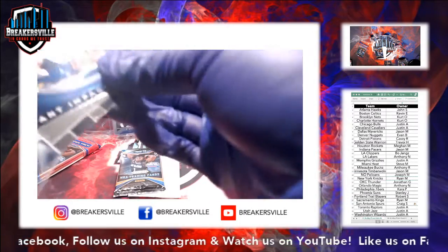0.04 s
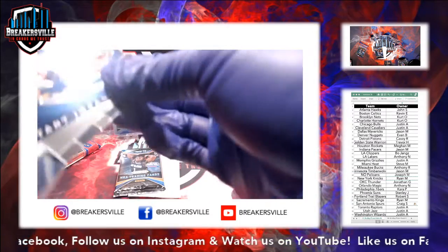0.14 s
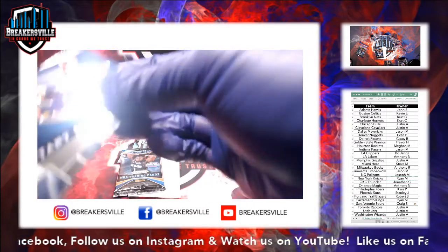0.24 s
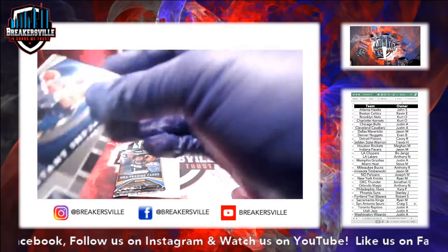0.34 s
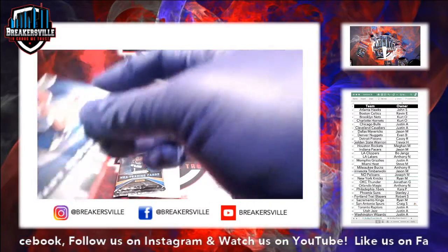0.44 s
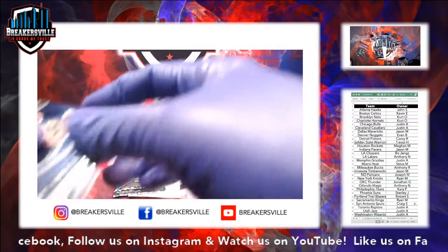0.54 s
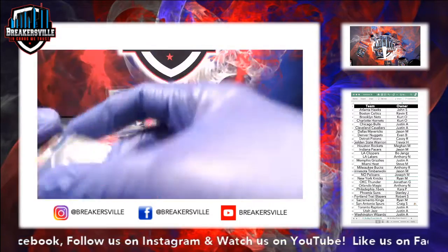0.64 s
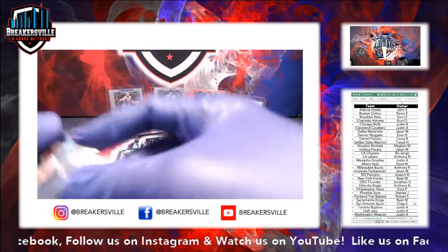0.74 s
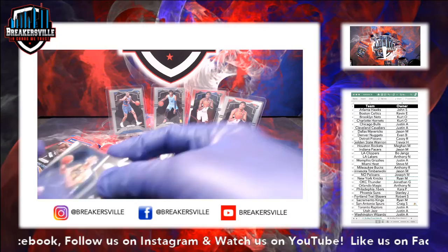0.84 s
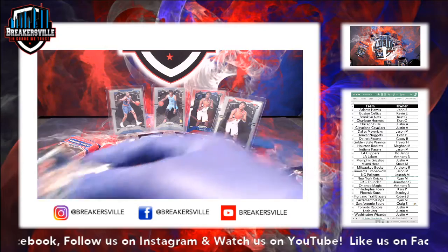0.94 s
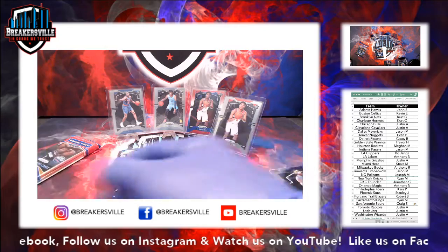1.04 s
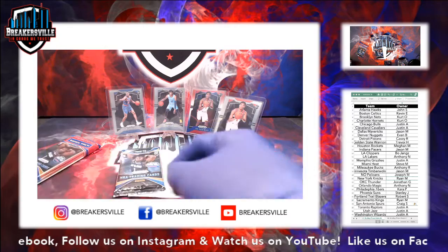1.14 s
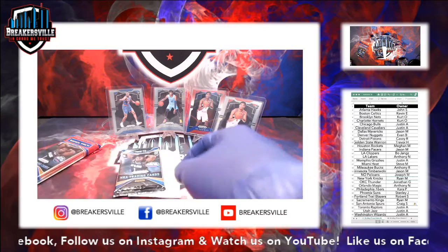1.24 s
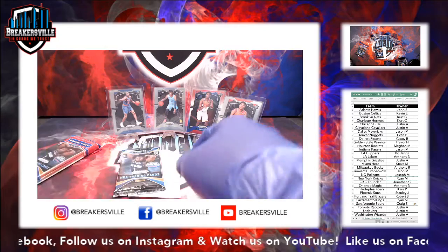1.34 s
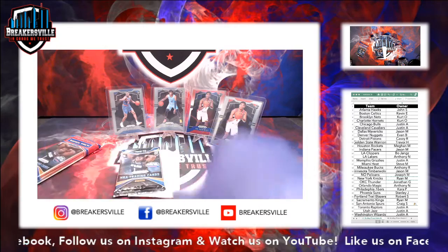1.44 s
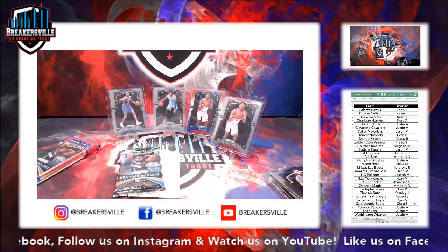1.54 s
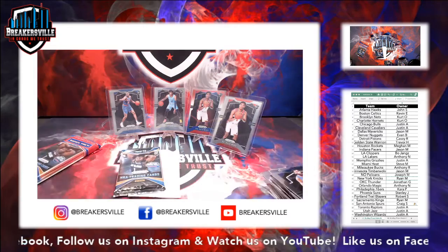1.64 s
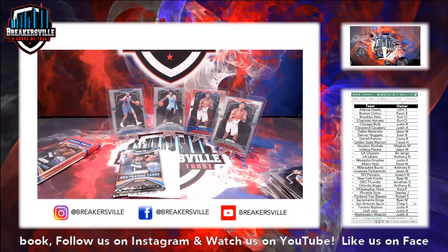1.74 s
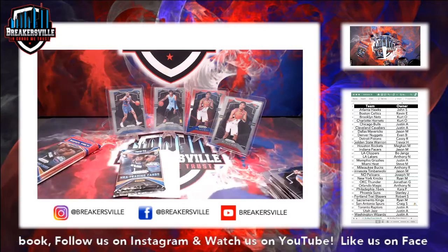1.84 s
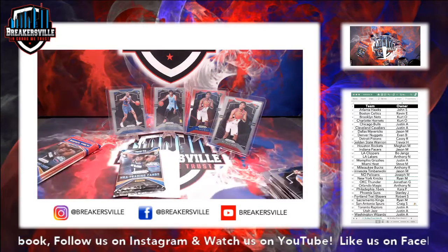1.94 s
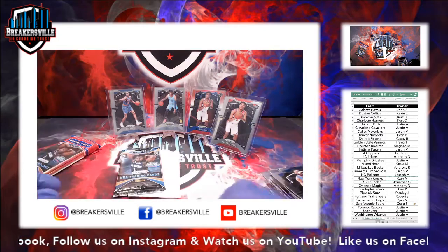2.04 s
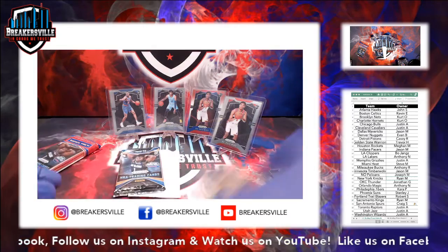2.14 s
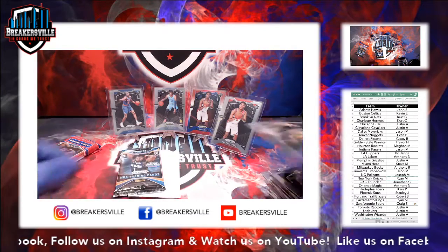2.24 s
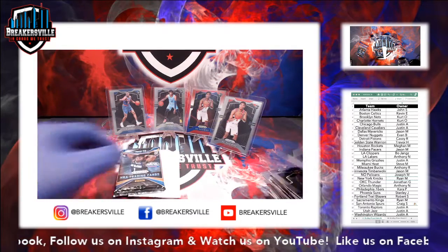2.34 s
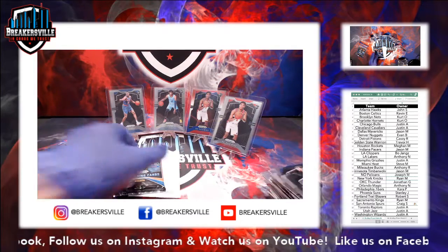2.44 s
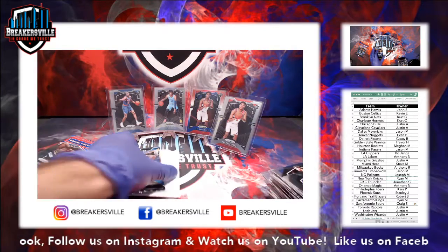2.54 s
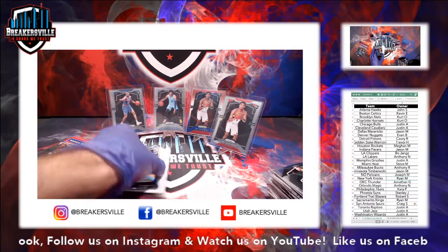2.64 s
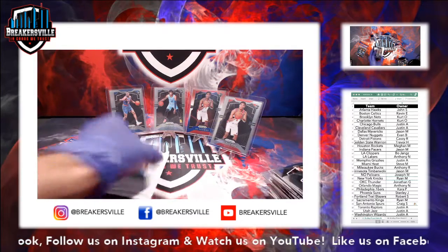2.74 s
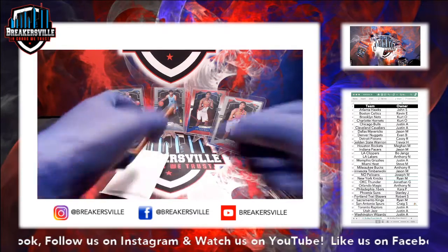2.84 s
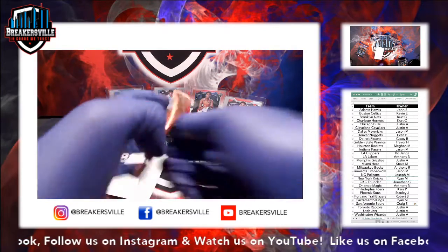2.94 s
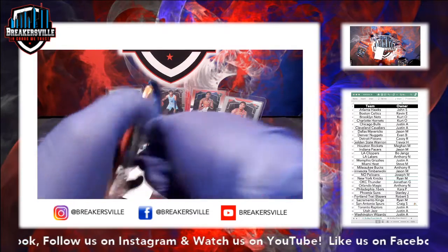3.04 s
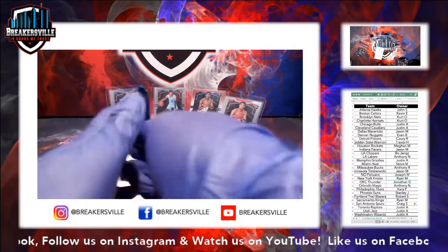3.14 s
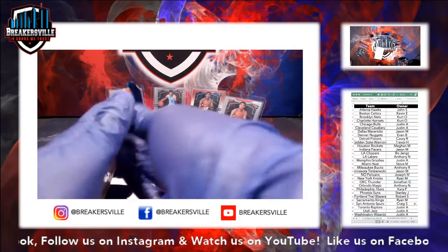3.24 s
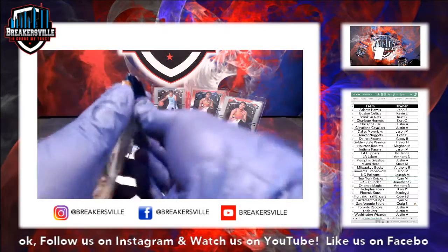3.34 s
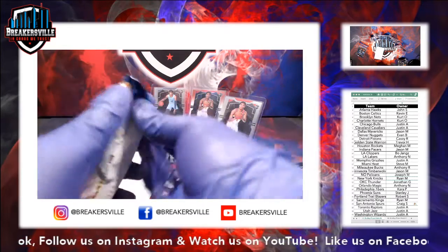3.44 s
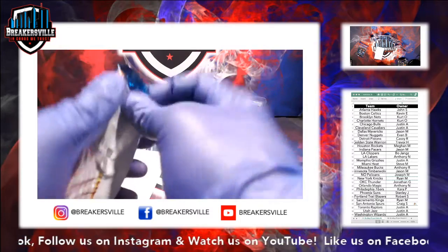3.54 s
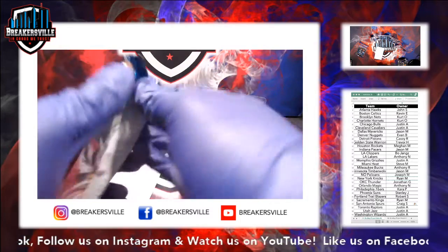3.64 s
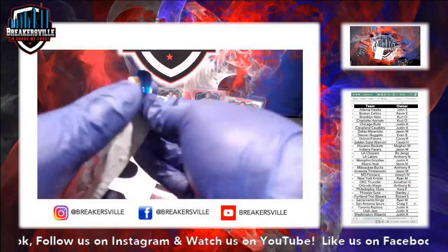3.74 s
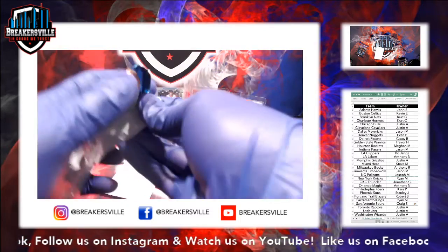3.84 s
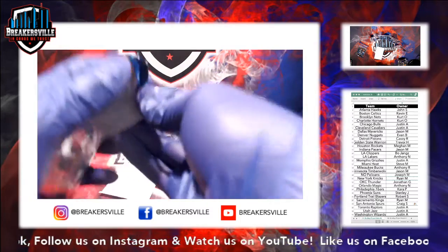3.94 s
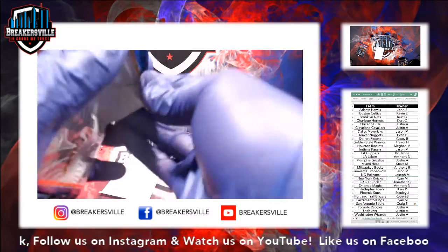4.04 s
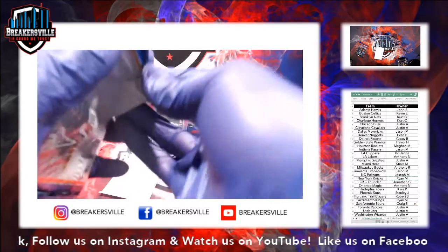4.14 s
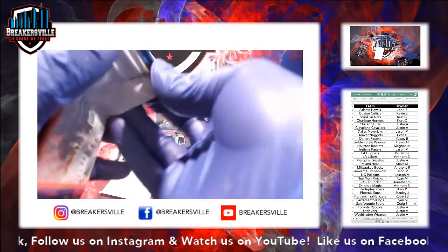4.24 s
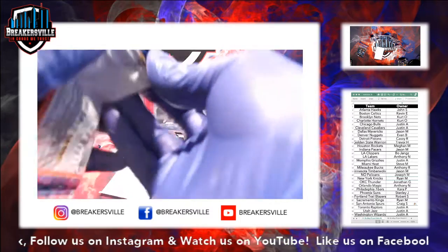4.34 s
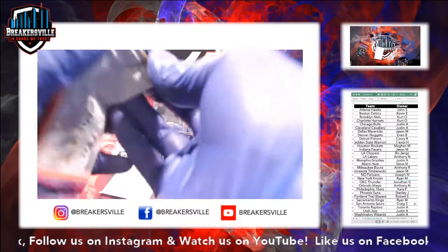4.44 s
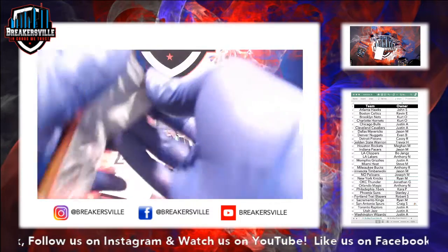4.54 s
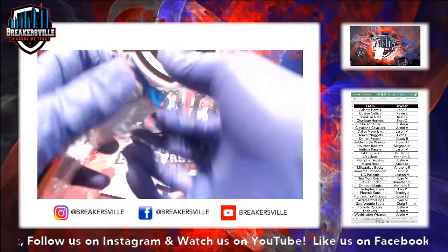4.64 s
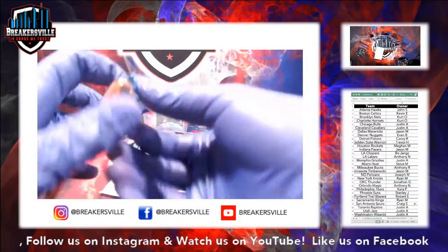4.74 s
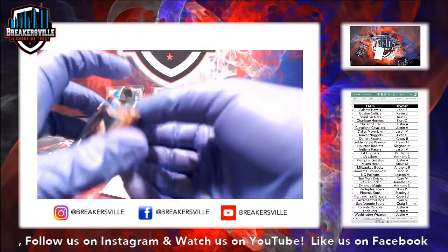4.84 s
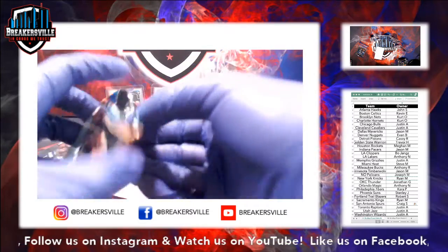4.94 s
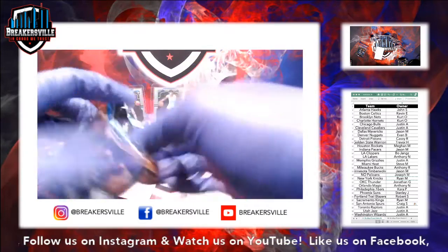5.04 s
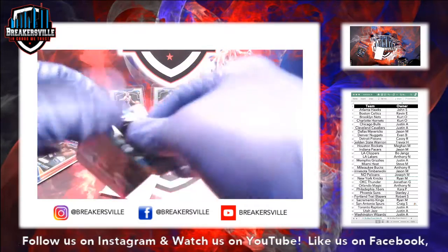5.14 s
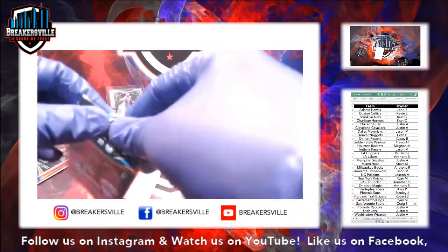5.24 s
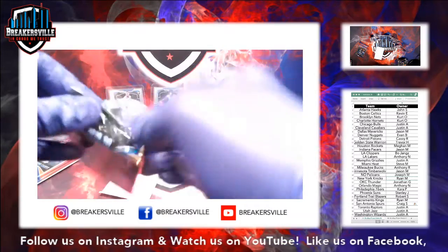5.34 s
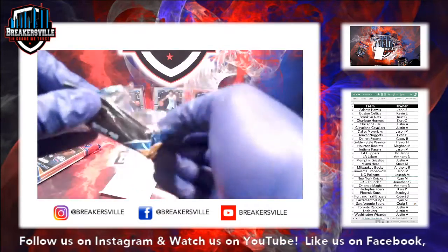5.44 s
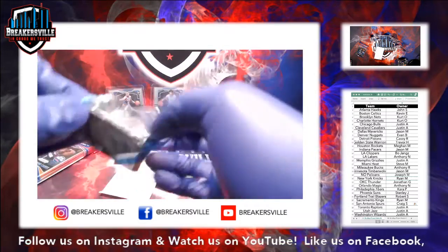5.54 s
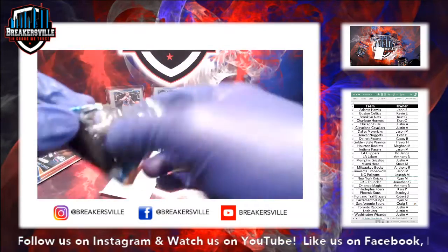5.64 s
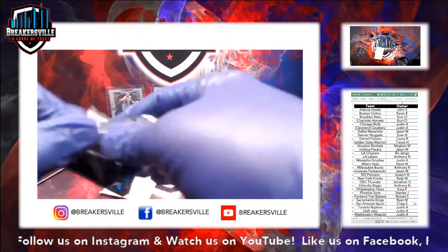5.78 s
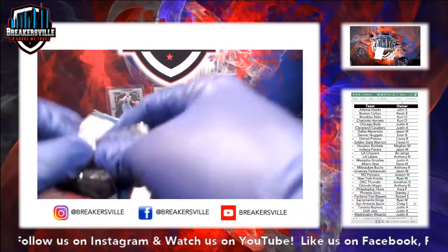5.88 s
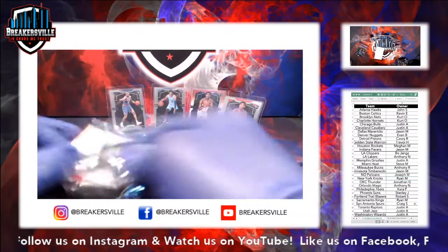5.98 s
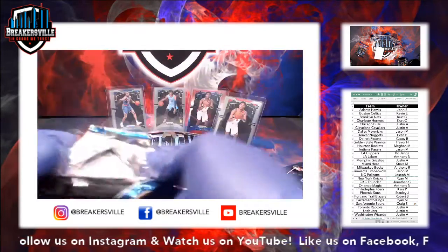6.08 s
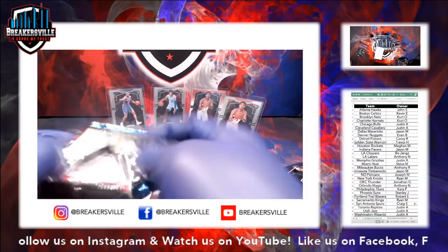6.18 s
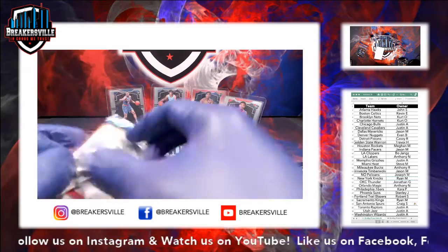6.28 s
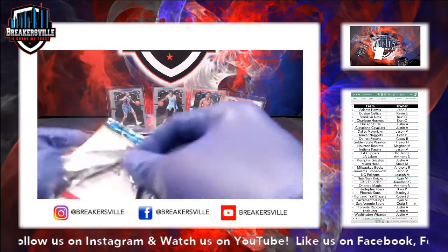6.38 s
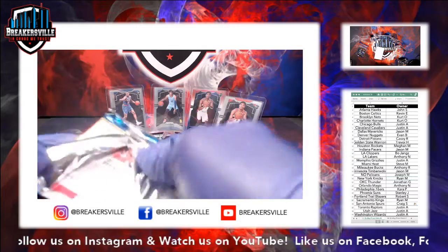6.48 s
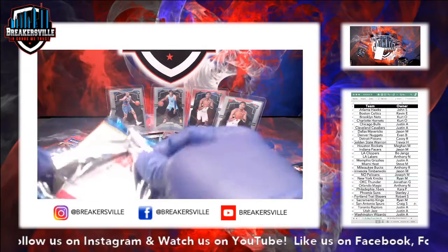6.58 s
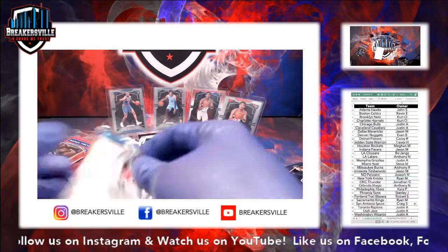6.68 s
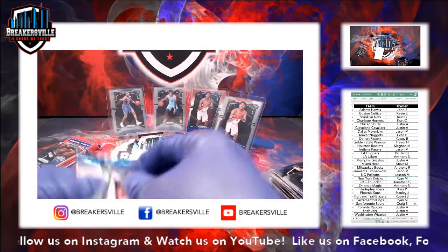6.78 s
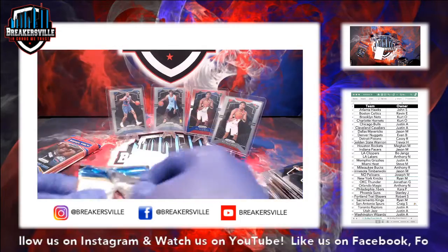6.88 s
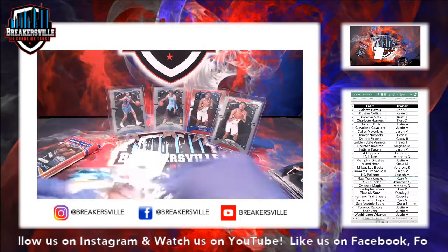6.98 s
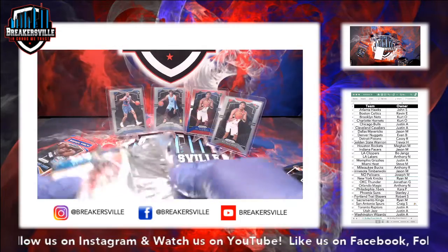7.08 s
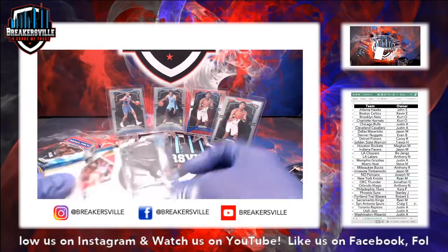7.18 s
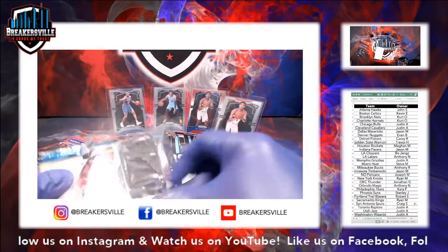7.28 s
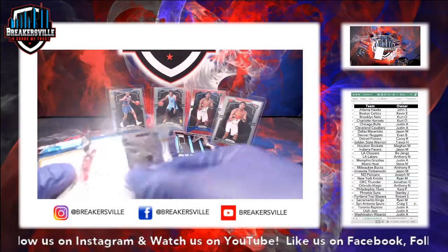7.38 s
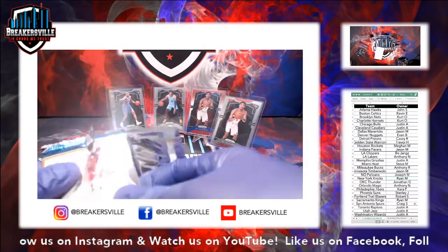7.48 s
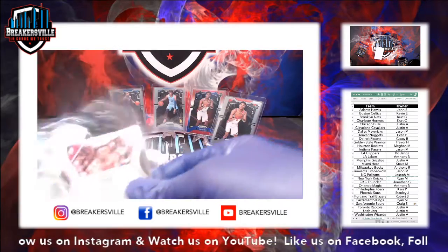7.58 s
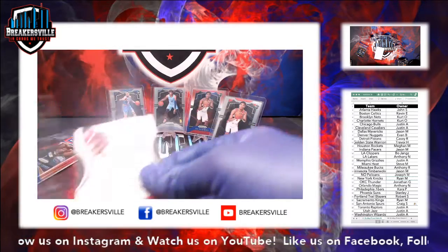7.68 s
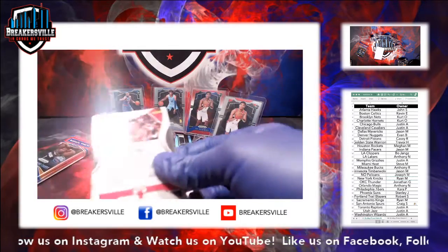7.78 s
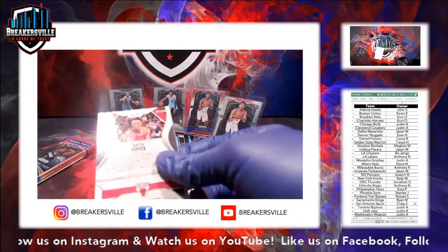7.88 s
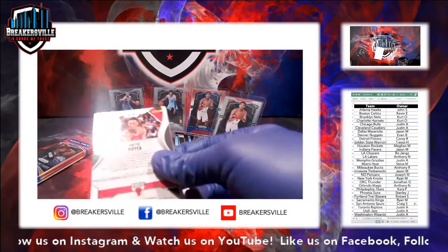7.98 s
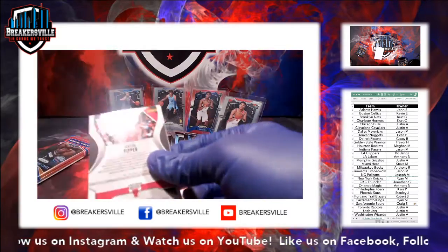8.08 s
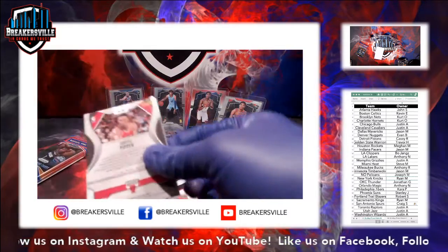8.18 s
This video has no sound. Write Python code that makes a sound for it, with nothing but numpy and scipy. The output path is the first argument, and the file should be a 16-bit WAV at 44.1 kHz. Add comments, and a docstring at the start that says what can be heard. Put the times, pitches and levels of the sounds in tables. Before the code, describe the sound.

Soft low table thumps and faint rustles, then a foil wrapper is crinkled and torn by hand in sharp crackling bursts, close up.

```python
"""Gloves slide lightly over a foil card wrapper in a small quiet room, close to a stereo microphone.
A few knocks on the table top follow, travelling into the microphone stand as damped table modes.
Then the wrapper is torn and crinkled: creases snap singly and in showers as noise bursts that ring
film facets and air pockets, over the filtered hiss of rubbing gloves. Puffs of air push the
microphone; ventilation rumble and microphone hiss lie underneath as shaped noise."""
import sys
import numpy as np
from scipy import signal
from scipy.fft import rfft, irfft
from scipy.io import wavfile
from scipy.ndimage import uniform_filter1d

SR = 44100
rng = np.random.default_rng(int(sys.argv[2]) if len(sys.argv) > 2 else 0)


def wav_out(sig):
    """Save sig, one row per channel (or a flat mono array), as 16-bit PCM at SR to the path in sys.argv[1]."""
    wavfile.write(sys.argv[1], SR, np.round(np.clip(np.atleast_2d(sig).T, -1, 1) * 32767).astype(np.int16))


N = 362237

# The room at rest. Each row: frequency in Hz, relative level in dB per Hz.
HUSH_SPECTRUM = [(15, -43), (30, -0.5), (60, 5.5), (110, -9.5), (229, -7.5), (293, -18), (796, -14.5),
                 (1150, -19), (1500, -14.5), (2480, -21), (8360, -31.5), (14400, -42), (16000, -53.5)]
# Likeness of the two channels in the room at rest. Each row: frequency in Hz, likeness 0-1.
HUSH_LIKENESS = [(50, 0.25), (500, 0.58), (4000, 0.29)]
# Gloves sliding lightly between the squeezes. Each row: time in seconds, relative level in dB.
SLIDING = [(0, -62), (.06, -101), (.12, -64), (.17, -77), (.27, -63), (.43, -72), (.5, -63.5), (.62, -64),
           (.9, -80), (1.6, -80), (1.75, -69), (1.95, -72), (2.1, -81.5), (3.2, -78), (4.4, -89),
           (5.9, -82), (6.1, -56.5), (6.5, -102), (6.75, -80.5), (7.05, -58.5), (7.7, -64), (8.21, -105.5)]
# Squeezes and pulls on the film. Each row: time of most force in seconds, relative rustle level in dB,
# build-up over 20 dB in seconds, die-away over 20 dB in seconds, share of smooth rubbing 0-1.
SQUEEZES = [(0.659, -48, 0.033, 0.014, 0.55), (.728, -58, 0.025, 0.032, 0.3), (.78, -59, 0.055, 0.12, 0.5),
            (.98, -55, 0.022, 0.046, 0.58), (1.24, -67.5, 0.13, 0.25, 0.4),
            (2.001, -61, 0.038, 0.037, 0.95), (2.4, -63, 0.086, 0.15, 0.02),
            (2.559, -54, 0.036, 0.26, 0.37), (2.96, -42.5, 0.02, 0.035, 0.07), (3.09, -52, 0.19, 0.04, 0.3),
            (3.16, -48, 0.035, 0.41, 0.07), (3.33, -41, 0.093, 0.051, 0.06), (3.39, -40, 0.058, 0.078, 1),
            (3.454, -32.5, 0.027, 0.087, 0.44), (3.511, -37, 0.16, 0.033, 0.56),
            (3.606, -36, 0.056, 0.1, 0.1), (3.788, -37.5, 0.046, 0.16, 0.01),
            (3.865, -45.5, 0.052, 0.041, 0.05), (3.947, -35, 0.024, 0.04, 0.2),
            (4.04, -48.5, 0.11, 0.21, 0), (4.198, -31, 0.024, 0.052, 0.44), (4.262, -48, .05, 0.14, 0.27),
            (4.54, -42.5, 0.021, 0.12, 0.24), (4.58, -42, 0.061, 0.12, 0), (4.709, -35.5, 0.022, 0.025, 0),
            (4.819, -41, 0.15, 0.049, 0.44), (4.92, -49.5, 0.034, 0.15, 0.01),
            (5.039, -42.5, 0.21, 0.17, 0), (5.18, -52, 0.16, 0.26, 0.14), (5.319, -37.5, 0.016, 0.35, 0.1),
            (5.37, -40, 0.057, 0.17, 0.44), (5.46, -45, 0.12, 0.16, 0.03), (5.67, -40.5, 0.074, 0.14, 0.28),
            (5.801, -39, 0.068, 0.039, 0.1), (5.873, -40, 0.062, 0.059, 0.1),
            (5.981, -29.5, 0.025, 0.13, 0.54), (6.02, -18, 0.043, 0.038, 1),
            (6.222, -36.5, 0.14, 0.051, 0.18), (6.331, -31.5, 0.062, 0.022, 0.08),
            (6.385, -34, 0.034, 0.17, 0.1), (6.42, -29, 0.068, 0.039, 0.3),
            (6.659, -38.5, 0.11, 0.096, 0.13), (6.79, -40, 0.0099, 0.02, 0.14),
            (6.872, -38.5, 0.0095, 0.14, 0.1), (6.924, -28.5, 0.058, 0.13, 0.43),
            (6.982, -25.5, 0.097, 0.042, 0.68), (7.16, -43.5, 0.16, 0.05, 0.13),
            (7.269, -53, 0.079, 0.33, 0.2), (7.5, -54, 0.27, 0.17, 0.7), (7.589, -41, 0.16, 0.065, 0.46),
            (7.999, -64, 0.076, 0.071, 0.06)]
# Rubbing of a firm glove. Each row: frequency in Hz, relative level in dB per Hz.
FIRM_GLOVE = [(200, -53), (1000, -12), (3000, 3.5), (7000, 4.5), (15000, -7.5)]
# Rubbing at the lightest touch, which is thinner. Each row: frequency in Hz, relative level in dB per Hz.
LIGHT_GLOVE = [(2500, -19.5), (7500, 0), (11000, -11), (15000, -6.5)]
# Colour of the creasing film. Each row: frequency in Hz, relative level in dB per Hz.
FILM_SPECTRUM = [(200, -22.5), (800, -25.5), (1500, -5), (2300, -3.5), (3500, -2.5), (7000, -1.5),
                 (10500, -5.5), (15000, -11.5)]
# Air pockets of the wrapper. Each row: resonance in Hz, relative level in dB.
AIR_POCKETS = [(400, -4.5), (600, -2), (820, -14), (1150, -2.5), (1350, -1.5), (1600, -4.5)]
# Place of the hands and opening of the pouch. Each row: time in seconds, left over right in dB,
# hollowness of the pouch in dB.
SIDE_OF_HANDS = [(0, 4.5, -10.5), (2.4, 4, -2.5), (3.2, 7, -13), (5.2, 4.5, -9), (6, 5.5, -10.5),
                 (6.4, 5, -11), (7, 4.5, -4), (7.3, 5, -4)]
# Likeness of the two channels in the film sound. Each row: frequency in Hz, likeness 0-1.
FILM_LIKENESS = [(60, 0.19), (380, 0.97), (2380, 0.51), (15000, 0.26)]
# Single loud creases. Each row: start in seconds, relative level in dB, pitch of the buckling facet in Hz,
# pop of the air pocket in dB relative to the crease, pitch of the pocket in Hz.
SNAPS = [(0.116, -47.5, 3160, -13, 1200), (0.6528, -43.5, 7600, -8.5, 303), (0.7541, -40.5, 3300, 5, 1250),
         (0.7881, -51, 4970, -18, 2400), (0.8174, -50, 6040, -6, 3000), (0.846, -50, 2980, -21, 840.0),
         (0.8865, -49, 4500, -30, 1500), (1.283, -46, 7600, -10, 700), (2.3973, -44.5, 1960, -8, 374),
         (2.474, -46.5, 5860, -30, 1400), (2.92, -41, 5990.0, -0.5, 327), (2.9544, -30, 5000, -30, 1300),
         (2.974, -33, 4080, -2.5, 2140), (2.9944, -28.5, 7960, -17, 1920), (3.054, -43.5, 7700, -7, 1160),
         (3.1489, -31, 5240, -19, 460), (3.184, -33, 8600, -16, 1640), (3.2198, -32.5, 5400, -17, 1890.0),
         (3.269, -41.5, 7920.0, 7, 1200), (3.2821, -30, 4470, -14, 1610), (3.3059, -16, 8600, -13.5, 1660),
         (3.3341, -16.5, 4060, -13.5, 1280), (3.3417, -17.5, 8850, -19, 450),
         (3.3654, -15.5, 9300, -34, 1240), (3.395, -28, 4000, -14, 460), (3.442, -19, 7050, -23, 595),
         (3.4924, -21.5, 6600, -20, 1200), (3.502, -21.5, 6360, -9.5, 1310),
         (3.514, -24.5, 3600, -13.5, 676), (3.5335, -26, 3600.0, -18, 690.0),
         (3.602, -32, 9090.0, -2, 1820), (3.664, -31.5, 4670, -11.5, 466), (3.674, -33.5, 3940, 0, 1270),
         (3.722, -30, 4150, -15, 1240), (3.7715, -32.5, 3730.0, -7, 935), (3.785, -24.5, 3600, -16, 517),
         (3.8087, -24.5, 6900, -3, 1770), (3.856, -30.5, 5200, -14, 1210), (3.9191, -28, 3400, -16, 1280),
         (3.94, -20, 3600, -5, 1580), (3.952, -25, 4470, -6.5, 1650), (3.9916, -29.5, 3460, -14, 1890.0),
         (4.026, -18.5, 3480, -9.5, 1370), (4.053, -31, 2700, -10, 1660.0), (4.078, -28, 3500, -15, 1650),
         (4.1257, -33, 3480, -16, 1700.0), (4.172, -29, 4260, -9, 1610.0), (4.1821, -12, 6060, -20, 1350),
         (4.193, -12.5, 9100, -21, 1370), (4.208, -18, 3600.0, -0.5, 1590), (4.2175, -14, 3360, -7.5, 1740),
         (4.261, -25.5, 3600, -38, 1590.0), (4.2956, -29, 3630, -10.5, 1980),
         (4.472, -55.5, 2010, 17.5, 1360), (4.534, -20.5, 3600, -13.5, 1380),
         (4.553, -24.5, 3780, -3.5, 1360), (4.568, -19.5, 3600, -6, 1280), (4.587, -21, 3450, -24, 1440),
         (4.6127, -16.5, 3500, -12, 1570), (4.6982, -17, 3600, -14, 2130), (4.715, -18, 5900, -31, 1700),
         (4.7614, -22.5, 7960, -40, 1570.0), (4.7778, -23, 7900, -19, 1900),
         (4.7866, -24, 9260.0, -14, 1300), (4.809, -23, 7000, -22, 420), (4.8403, -27.5, 9100, -37, 1640.0),
         (4.9146, -29, 6100, -7.5, 1520), (4.9585, -28, 5300.0, -17, 530), (4.9966, -32, 5900, -30, 1160.0),
         (5.0256, -31, 4240, -3.5, 1300), (5.0416, -25.5, 4250, -8.5, 360),
         (5.071, -26.5, 6200, -8.5, 1450), (5.1244, -32, 4860, -9, 1760), (5.174, -27, 2900, -42, 1910),
         (5.29, -26.5, 10000, -22, 320.0), (5.3568, -32, 4280, 0, 1380), (5.4403, -21.5, 3530, -10, 1190),
         (5.4624, -26, 5080.0, -9, 1030.0), (5.487, -48.5, 5000, -4, 1000),
         (5.5148, -31, 3720, -31, 1810.0), (5.5277, -34, 1300, 1.5, 710), (5.6693, -26, 6200, -14, 650),
         (5.704, -22.5, 3660, -19, 1280), (5.728, -18.5, 6250, -26, 1130),
         (5.862, -25.5, 3350, -30, 1120.0), (5.8793, -33.5, 2760, -1, 507), (6.016, -14.5, 8600, -12, 1180),
         (6.033, -20, 5200, -13, 1350), (6.0794, -25, 7900.0, -17, 1250), (6.27, -35, 2700, -23, 1200),
         (6.3115, -24.5, 7800, -17, 510), (6.324, -30.5, 5000, -27, 450), (6.335, -20, 3400, -15, 1190),
         (6.413, -24, 5000, -5, 605), (6.4429, -14, 4100, -7, 1010), (6.495, -25.5, 6300, -14, 1360),
         (6.592, -29, 8800, -19, 1230.0), (6.614, -28, 5200, -11.5, 1040), (6.6402, -25, 3200, -19, 1250),
         (6.6661, -24.5, 4560, -13, 417), (6.6829, -27, 4740, -15, 1130), (6.7337, -34.5, 3060, -10, 1780),
         (6.761, -61, 2970, 21.5, 574), (6.7851, -30.5, 5900, -4.5, 1300), (6.878, -24.5, 7360, -2, 1920),
         (6.9033, -12.5, 8700, -19, 1770), (6.9229, -7.5, 6500, -8.5, 1440),
         (6.948, -11.5, 6650, -16, 1420.0), (6.979, -13, 5320.0, -25, 1600), (6.9838, -7, 8600, -2.5, 1574),
         (6.989, -18.5, 6200.0, 3.5, 1165), (7.1058, -26, 5800, -2.5, 1250), (7.112, -33, 5000, -2.5, 354),
         (7.1516, -22, 7800, -19, 1670), (7.2608, -28, 1220, -6.5, 330), (7.3638, -38, 4320, -4, 1460),
         (7.5749, -25, 8150, -7, 1480), (7.9946, -46.5, 7040, -22, 980)]
# Decay of the small room. Each row: frequency in Hz, time to fall 60 dB in seconds.
ROOM_DECAY = [(500, 0.13), (3000, 0.06), (12000, 0.026)]
# Knocks on the table. Each row: start in seconds, relative level in dB, then relative to that level
# deep sway in dB, upper ring in dB, contact tick in dB.
KNOCKS = [(1.283, -48, -2, -16, -5), (1.315, -35, -3.5, -20.5, -10.5), (1.593, -21.5, -17, -11.5, -30.5),
          (1.665, -44.5, 4.5, -5, -19), (1.725, -33.5, -46, -7, -19.5), (1.779, -47.5, 0.5, 1.5, -8),
          (1.839, -50.5, -5, -8, -30), (2, -56.5, 1, -2.5, -17), (2.4, -34, -10, -27, -16.5),
          (2.435, -36, -40, -24, -22), (2.523, -29.5, -11.5, -21, -44), (2.553, -29, -13.5, -23, -46),
          (2.598, -44, -2.5, -17, -24), (6.974, -51, -6, 7, 25.5)]
# Table modes, deep sway first and upper ring last. Each row: frequency in Hz,
# time for the mode to fall 60 dB in seconds, left over right in dB.
TABLE_MODES = [(46.6, 0.95, 4), (86.9, 0.16, 2), (107.1, 0.11, -3.5), (213, 0.24, 7)]
# Puffs from the wrapper at the microphone. Each row: start in seconds, relative level in dB,
# half cycle in seconds.
PUFFS = [(2.919, -46.5, 0.008), (6.652, -49, 0.0094), (6.775, -52, 0.0074), (6.873, -51, 0.0086),
         (6.963, -48, 0.007), (7.099, -50, 0.0036), (7.293, -51, 0.0096), (7.359, -50, 0.0079),
         (7.519, -51.5, 0.011)]

HUSH_DB = -66.5  # rms level of the room at rest
SMOOTH_SLIDING = 0.77  # share of smooth rubbing in the sliding
ROUNDING = 1.1  # rounded top, steepening flanks: a squeeze falls in dB as this power of time
LIGHT_DB = -54.5  # rustle level at which light and firm touch mix equally
EDGE_HZ = 16000  # upper band limit


def gain_of(db):
    """Decibels to an amplitude factor."""
    return 10 ** (np.asarray(db) / 20)


def evened(x):
    """Scales to rms 1."""
    return x / np.sqrt(np.mean(x ** 2) + 1e-20)


def read(points, hz):
    """Reads a curve on a log-frequency axis."""
    f, value = np.transpose(points)
    return np.interp(np.log(hz + 1), np.log(f + 1), value)


def along(rows):
    """Reads the columns of a time curve at every sample."""
    s, *columns = np.transpose(rows)
    return [np.interp(np.arange(N) / SR, s, column) for column in columns]


def panned(db):
    """Gains of left and right for a left-over-right difference in dB."""
    return gain_of(np.multiply.outer([.5, -.5], db))


def pair(x, likeness):
    """Mixes three unrelated signals into two channels, one shared and two private, alike by band."""
    hz = np.fft.rfftfreq(N, 1 / SR)
    share = np.clip(read(likeness, hz), 0, 1)
    z = rfft(x)
    return irfft(np.sqrt(share) * z[:1] + np.sqrt(1 - share) * z[1:], N)


def coloured(x, points):
    """Minimum-phase filter of unit energy with the given spectrum, so nothing sounds early."""
    hz = np.abs(np.fft.fftfreq(2048, 1 / SR))
    log_gain = np.log(gain_of(np.maximum(read(points, hz), -60)))
    taps = np.fft.ifft(np.exp(signal.hilbert(log_gain).conj())).real[:1024]
    return signal.oaconvolve(x, taps[None] / np.linalg.norm(taps), axes=1)[:, :N]


def resonate(x, hz, width):
    """Two-pole resonance of peak gain 1, its width in Hz."""
    return signal.lfilter(*signal.iirpeak(hz, hz / width, SR), x)


def hush():
    """Ventilation rumble and microphone hiss: noise shaped to the spectrum of the room at rest."""
    z = rfft(pair(rng.standard_normal((3, N)), HUSH_LIKENESS))
    hz = np.fft.rfftfreq(N, 1 / SR)
    # the fan's rumble gathers near one pitch
    fan_db = 5.6 * np.exp(-((hz - 52) / 11) ** 2) - 4.9 * (hz < 110)
    return gain_of(HUSH_DB) * evened(irfft(z * gain_of(read(HUSH_SPECTRUM, hz) + fan_db), N))


def hands():
    """Rustle level in dB and share of smooth rubbing: squeezes build and die in power over the sliding."""
    t = np.arange(0, N + 64, 64) / SR
    s, db, build_s, die_s, smooth = np.transpose(SQUEEZES)[:, :, None]
    from_peak = np.where(t < s, (s - t) / build_s, (t - s) / die_s)
    squeezes = gain_of(db - 20 * from_peak ** ROUNDING) ** 2
    slide = gain_of(np.interp(t, *np.transpose(SLIDING))) ** 2
    power = squeezes.sum(axis=0) + slide
    share = ((smooth * squeezes).sum(axis=0) + SMOOTH_SLIDING * slide) / power
    return [np.interp(np.arange(N) / SR, t, curve) for curve in (10 * np.log10(power), share)]


def rubbing(level_db):
    """Glove friction: steady hiss whose colour passes from light to firm touch as the level rises."""
    light = np.clip((LIGHT_DB - level_db) / 10 + .5, 0, 1)
    hiss = rng.standard_normal((3, N))
    return (1 - light) * coloured(hiss, FIRM_GLOVE) + light * coloured(hiss, LIGHT_GLOVE)


def crease_bursts(level_db):
    """Random small creases, a few large, falling in clumps; each starts at once and dies in milliseconds."""
    clumps = gain_of(3 * evened(uniform_filter1d(rng.standard_normal(N), 500)))
    denser = gain_of(0.66 * np.maximum(level_db + 41.5, 0))  # a hard pull breaks more creases at once
    size = gain_of(3.5 * np.minimum(rng.exponential(1, N), 3))
    size = size * (rng.random(N) < 330 * clumps * denser / SR)  # 330 a second before clumping
    decay = np.exp(-np.arange(400) / SR / .0007)  # of power
    return evened(np.sqrt(abs(signal.oaconvolve(size ** 2, decay)[:N])))


def facets(drive):
    """Film facets ring under the creases, one facet size favoured in each 128-sample stretch."""
    pick = np.repeat(rng.integers(0, 6, N // 128 + 1), 128)[:N]
    sizes_hz = [3060, 3600, 3820, 5990, 8600, 13500]
    return sum(resonate(drive * (pick == k), hz, .18 * hz) for k, hz in enumerate(sizes_hz))


def pouch(drive):
    """Small creases pop the wrapper's air pockets, one pocket excited in each 256-sample stretch."""
    pick = np.repeat(rng.integers(0, len(AIR_POCKETS), N // 256 + 1), 256)[:N]
    return sum(gain_of(db) * resonate(drive * (pick == k), hz, 0.49 * hz)
               for k, (hz, db) in enumerate(AIR_POCKETS))


def rustle():
    """Showers of creases through film and air pockets, mixed in power with the smooth hiss of rubbing."""
    level_db, smooth = hands()
    smooth = np.clip(smooth, 0, 1)
    burst = crease_bursts(level_db)
    drive = burst * rng.standard_normal((3, N))
    film = evened(coloured(0.5 * drive + facets(drive), FILM_SPECTRUM))
    hollow = evened(pouch(drive / np.sqrt(burst + 0.064)))  # the pockets even out the sizes
    creases = film + gain_of(along(SIDE_OF_HANDS)[1]) * hollow
    return gain_of(level_db - 2.0) * (np.sqrt(1 - smooth) * creases + np.sqrt(smooth) * rubbing(level_db))


def snaps():
    """Each loud crease lets go in a short burst of slips that rings its film facet and an air pocket."""
    t = np.arange(1024) / SR
    bright, hollow = np.zeros((3, N + 1024)), np.zeros((3, N + 1024))
    slips = rng.standard_normal((len(SNAPS), 3, len(t)))
    shape = (1 - np.exp(-t / .0002)) * (np.exp(-t / .001) + .1 * np.exp(-t / .012))
    crack = np.exp(-t / 0.00036)  # the wide-band crack dies before the facet does
    for (s, db, hz, pop_db, pop_hz), slip in zip(SNAPS, slips):
        at = round(s * SR)
        burst = evened(slip * shape) / np.sqrt(len(t))
        ring = resonate(burst, hz, 0.19 * hz)
        ring = ring / np.linalg.norm(ring, axis=1, keepdims=True)
        bright[:, at:at + len(t)] += gain_of(db + 11.0) * (1.91 * burst * crack + 0.56 * ring)
        pop = resonate(burst * np.exp(-t / .009), pop_hz, .3 * pop_hz)
        pop = evened(resonate(pop, pop_hz, 1.5 * pop_hz))
        hollow[:, at:at + len(t)] += gain_of(db + pop_db - 19.0) * pop
    return coloured(bright, FILM_SPECTRUM) + hollow[:, :N]


def room(x):
    """A dense noise tail after the first bounce off the table, each band dying at its own speed."""
    taps = rng.standard_normal((2, SR // 2)) * (np.arange(SR // 2) > .005 * SR)  # bounce after 5 ms
    hz, t, z = signal.stft(taps, SR, nperseg=128)
    tail = signal.istft(z * gain_of(-60 * t / read(ROOM_DECAY, hz)[:, None]), SR, nperseg=128)[1]
    return signal.fftconvolve(x, tail / np.linalg.norm(tail[0]), axes=1)[:, :N]


def knocks():
    """Each knock is a soft push that swells into the table modes; where it lands sets their balance."""
    out, t = np.zeros((2, N + SR)), np.arange(SR // 2) / SR
    swell = np.sin(np.pi / 2 * np.minimum(t / 0.022, 1)) ** 2  # a padded hand builds its force gradually
    swell = swell * (0.2 + np.exp(-t / 0.032))  # the resting hand damps the first swings
    scrapes = resonate(rng.standard_normal((len(KNOCKS), len(t))), 380, 200)
    scrapes = scrapes * t / .003 * np.exp(-t / .005)
    for (s, db, deep_db, upper_db, tick_db), scrape in zip(KNOCKS, scrapes):
        sound = gain_of(db + tick_db) * scrape / abs(scrape).max() * np.ones((2, 1))
        for (hz, t60, pan_db), mode_db in zip(TABLE_MODES, [deep_db, 0, -4., upper_db]):
            # left leads a little in phase
            swing = np.sin(2 * np.pi * (hz * t + 0.13 * np.array([[.5], [-.5]])))
            decay = gain_of(db + mode_db + 8.5 - 60 * t / t60)
            sound = sound + panned(pan_db)[:, None] * decay * swing * swell
        out[:, round(s * SR):][:, :len(t)] += sound
    return out[:, :N]


def puffs():
    """Air pushes the microphone: a soft pressure swing in and out that dies over a few half cycles."""
    out, t = np.zeros(N + SR), np.arange(SR // 8) / SR
    for s, db, half in PUFFS:
        swing = np.sin(np.pi * t / half) * t / half * np.exp(-t / half)
        out[round(s * SR):][:len(t)] += gain_of(db + 7.5) * swing
    return panned(6.4)[:, None] * out[:N]


def scene():
    """The close wrapper with its room, knocks through the stand, puffs, and the quiet."""
    wrapper = panned(along(SIDE_OF_HANDS)[0]) * pair(rustle() + snaps(), FILM_LIKENESS)
    return hush() + wrapper + gain_of(-13.0) * room(wrapper) + knocks() + puffs()


def record(dry):
    """A linear-phase low-pass takes away the treble above the band limit."""
    low_pass = signal.firwin(511, EDGE_HZ, window=("kaiser", 9), fs=SR)
    return signal.oaconvolve(dry, low_pass[None], "same")


dry = scene()
out = record(dry)
wav_out(out)
```